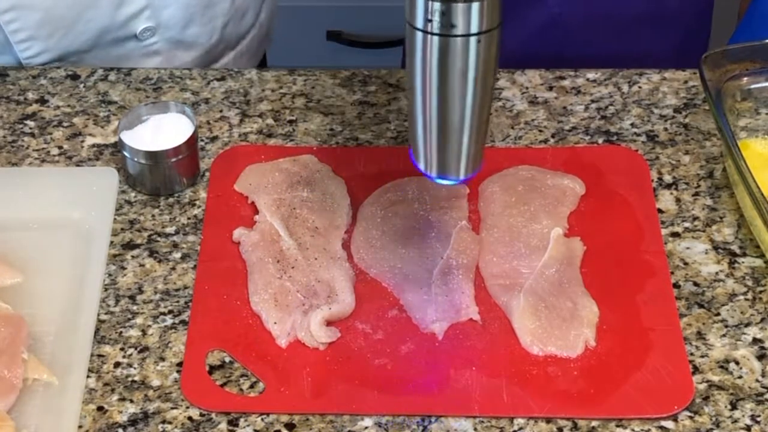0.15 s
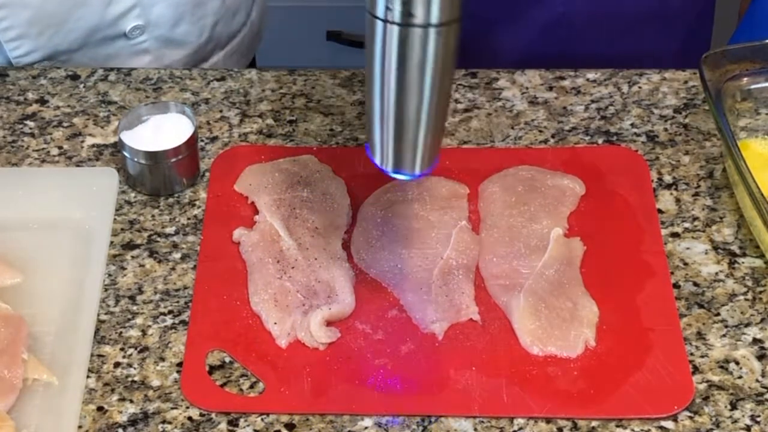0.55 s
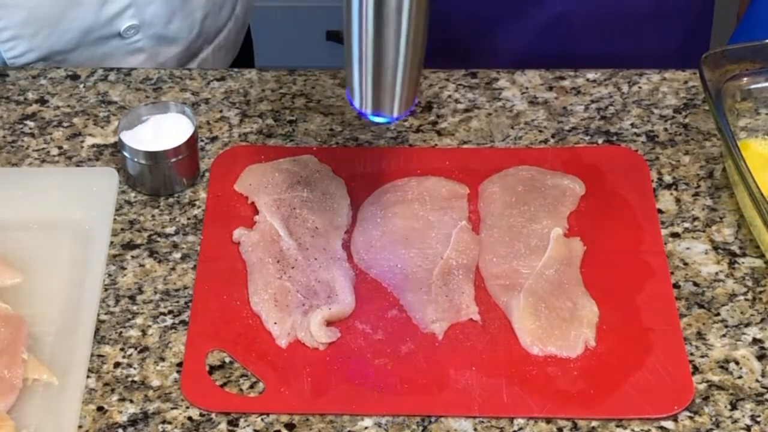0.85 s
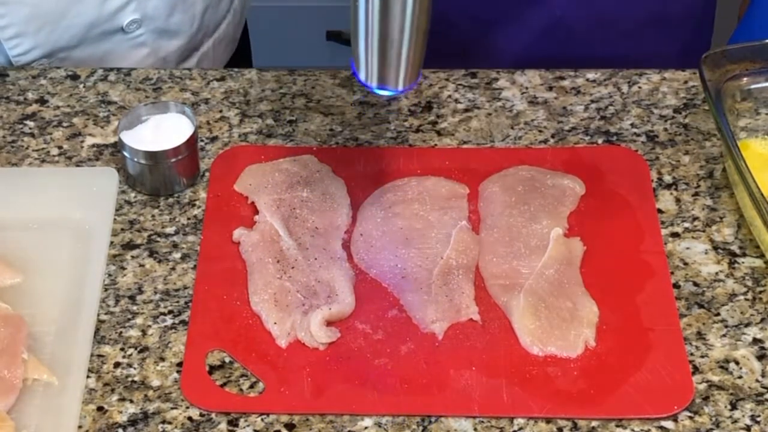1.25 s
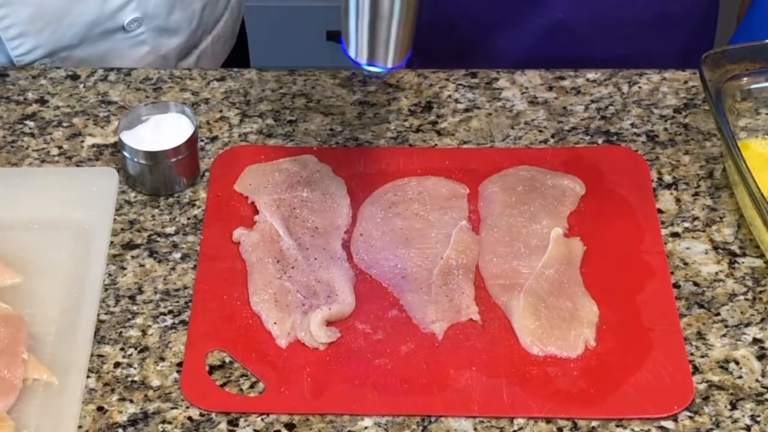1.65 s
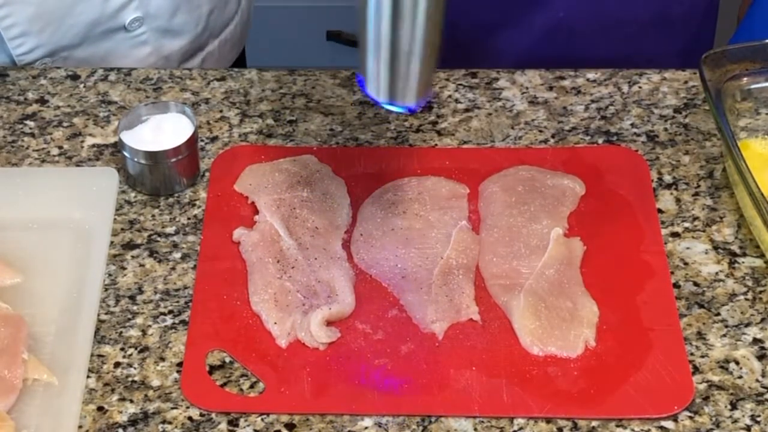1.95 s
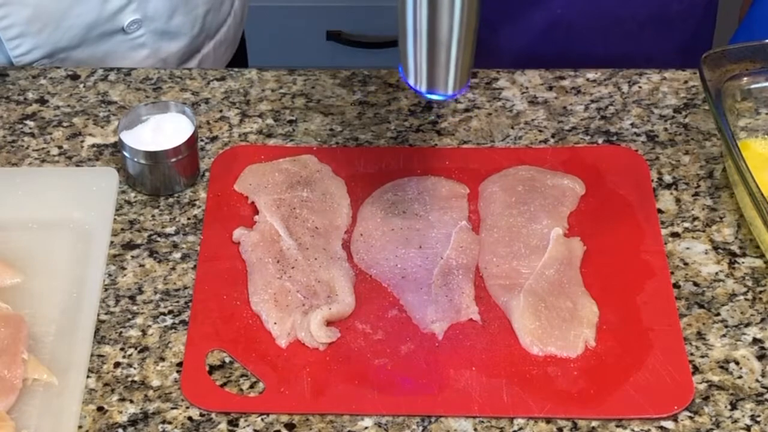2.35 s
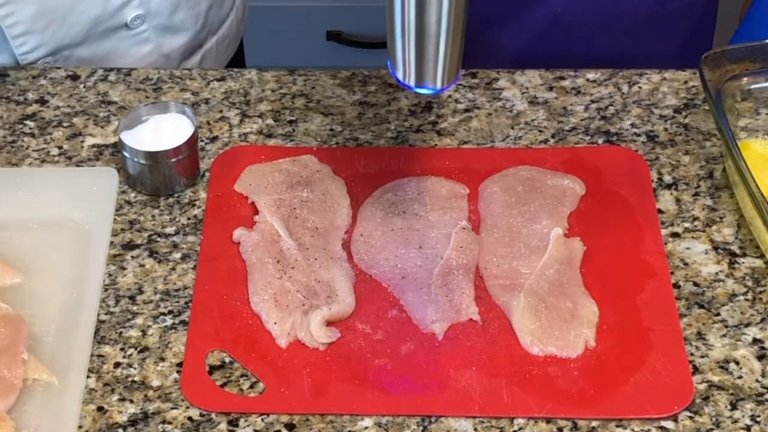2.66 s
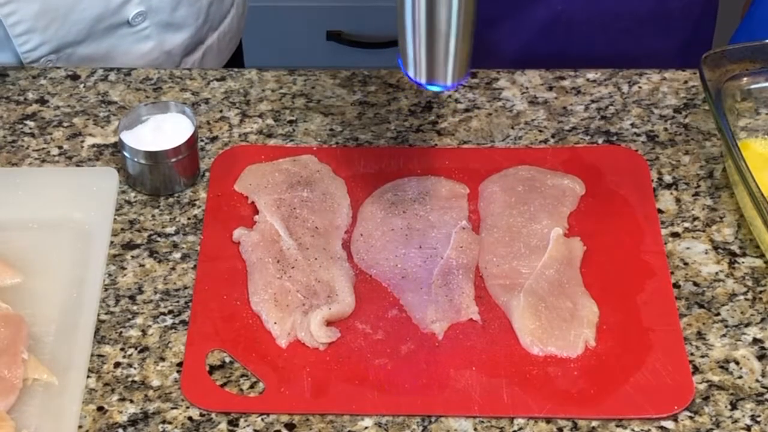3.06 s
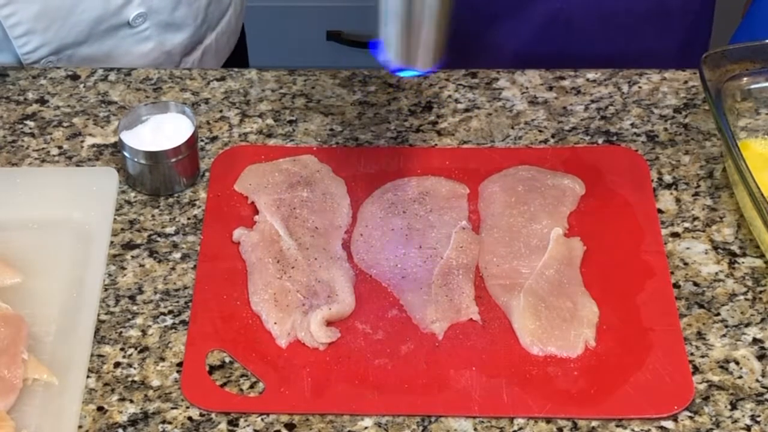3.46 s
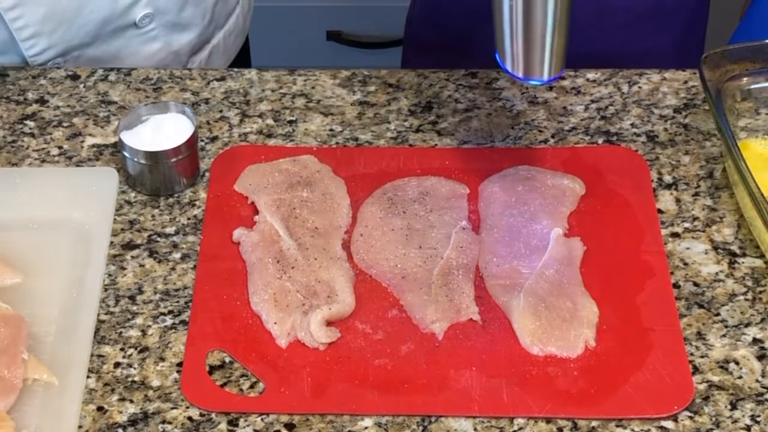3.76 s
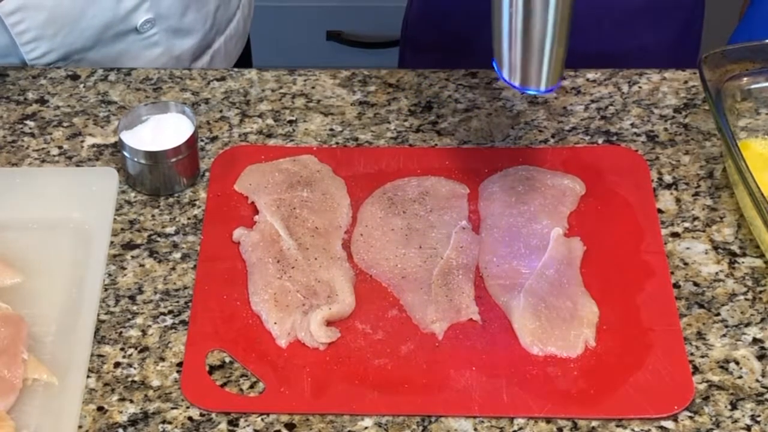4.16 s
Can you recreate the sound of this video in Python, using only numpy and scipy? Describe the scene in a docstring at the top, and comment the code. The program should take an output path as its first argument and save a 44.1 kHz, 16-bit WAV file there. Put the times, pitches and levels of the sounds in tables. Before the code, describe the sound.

Close up in a kitchen, an electric pepper grinder gives a wavering gear whine and a high, crunchy hiss in its steel housing. Soft ticks mark the start, a sharp peppercorn crack follows about a second in, and a louder one comes later among smaller snaps. The grinding turns lower and raspier toward the end. The sound is mono, with a faint low room tone behind it.

```python
"""A kitchen counter, with a battery pepper mill running above it, close to a mono microphone.
The motor sags and recovers as peppercorns load the burr; whenever they brake it, the gears whine
harder and the burr crushes louder, with a gritty hiss in a steel housing. Gear teeth catch early on,
a few corns snap, and a hard one makes the mill rasp near the end. Faint room rumble lies underneath."""
import sys
import numpy as np
from scipy import signal
from scipy.fft import rfft, irfft
from scipy.io import wavfile
from scipy.ndimage import uniform_filter1d, map_coordinates

SR = 44100
rng = np.random.default_rng(int(sys.argv[2]) if len(sys.argv) > 2 else 0)


def log_audio(samples):
    """Write samples as a 16-bit WAV file to the path given in sys.argv[1]."""
    # one column per channel
    frames = np.atleast_2d(samples).T
    # limit to full scale, then quantise
    limited = np.clip(frames, -1, 1)
    pcm = np.round(limited * 32767).astype(np.int16)
    wavfile.write(sys.argv[1], SR, pcm)


N = 190244
TIME = np.arange(N) / SR

# the motor under its changing load: (time [s], speed [turns/s])
MOTOR_SPEED = [(0.0, 83.57), (0.17, 84.54), (0.21, 81.13), (0.44, 88.26), (0.55, 87.68), (0.82, 79.83),
               (0.97, 87.68), (1.05, 79.5), (1.13, 83.67), (1.55, 87.56), (1.66, 82.2), (1.96, 79.46),
               (2.18, 86.54), (2.31, 82.31), (2.45, 84.66), (2.6, 79.4), (2.76, 80.22), (2.89, 74.73),
               (2.97, 82.95), (3.11, 70.29), (3.26, 77.31), (3.34, 74.12), (3.5, 83.56), (3.59, 79.42),
               (3.68, 82.36), (3.86, 71.05), (4.01, 67.94), (4.12, 73.34), (4.31, 78.3)]
# partials of the pinion's low and upper whines and of the second gear stage:
# (multiple of motor speed [x], relative level [dB])
PINION_LOW_ORDERS = [(6, -15), (9, -4), (12.33, -6.5), (18, -1.5), (21.33, -1)]
PINION_UPPER_ORDERS = [(27, 0.5), (30.5, -27)]
SECOND_STAGE_ORDERS = [(20, -2.3), (41.33, -22), (62, -19)]
# how tightly the gears mesh: (time [s], second stage base level [dB], upper whine base level [dB])
MESH_LEVELS = [(0, -44.5, -40), (.25, -43, -36.5), (.5, -56, -55), (.8, -40.5, -43.5), (.95, -53, -40),
               (1.05, -46, -44), (1.17, -40.5, -43), (1.36, -39.5, -36), (1.56, -46, -47), (1.95, -41, -41),
               (2.15, -46.5, -38.5), (2.45, -37, -40.5), (2.76, -41, -40), (2.9, -40.5, -44),
               (3.05, -46, -44), (3.11, -35.5, -35), (3.16, -47, -48), (3.48, -44, -40), (3.68, -46, -42),
               (3.9, -36.5, -47), (4.31, -37, -39)]
# the mill at work: (time [s], gear rattle level [dB], burr base level [dB])
WORK_LEVELS = [(0.0, -38, -39.0), (0.12, -34.0, -38.5), (1.05, -36.5, -35.5), (1.13, -38.5, -38.5),
               (1.4, -34, -38), (1.48, -36.5, -36.5), (1.55, -33, -42), (1.67, -35.5, -37.5),
               (2.57, -36, -39), (2.71, -34, -39.5), (2.79, -35.5, -37), (3.11, -35, -39.5),
               (3.21, -37.5, -36.5), (3.31, -35.5, -38), (3.36, -39.0, -37), (3.71, -38.0, -40.5),
               (3.8, -36.5, -39), (4.31, -38, -39)]
# spectra of uneven teeth at mean speed, knocks through the housing, crushed pepper and its splinters:
# (frequency [Hz], relative level [dB])
WHIRR_SPECTRUM = [(250, -36), (500, -15), (800, -14), (1000, -10), (1250, -6.5), (1480, -1), (1900, -0.5),
                  (2200, 0.5), (2380, -6), (2850, -8), (3550, -10.5), (4200, -11)]
HOUSING_SPECTRUM = [(2000, -11), (3000, -10.5), (3280, -0.5), (3600, -4), (3900, 0), (4450, 3),
                    (4950, -1.5), (5300, -2), (5600, 1.5), (6100, -9), (8000, -6.5), (15000, -26.5)]
BURR_SPECTRUM = [(3000, -39), (5300, -7), (6000, 2), (6600, 3.5), (7100, 1.5), (7500, -1.5), (8300, -7),
                 (9200, -6.5), (12000, -8)]
SPLINTER_SPECTRUM = [(5000, -1), (8200, -3), (9450, 5.5), (10200, 1.5), (11200, 1.5), (12400, -2),
                     (13000, -7), (13700, -9), (15800, -9.5)]
# housing resonances under the hand: (frequency [Hz], width [Hz])
HAND_MODES = [(4270, 230), (5650, 330), (6500, 350), (7150, 200)]
# the steel tube's two rings: (time [s], lower pitch [Hz], lower base level [dB], upper level [dB])
TUBE_RINGS = [(0, 8070, -46, -50), (.35, 8180, -40, -56), (.5, 7920, -44, -48), (1.2, 7775, -40.5, -51),
              (1.55, 7774, -49, -46.5), (2.3, 7844, -51, -47), (2.9, 7826, -43, -46),
              (3.45, 7820, -44.5, -48.5), (4.31, 7920, -43.5, -49)]
# room rumble: (frequency [Hz], relative level [dB])
RUMBLE_SPECTRUM = [(25, -29), (40, -20), (60, -5), (80, -6), (99, 2), (115, -3.5), (135, -1), (200, -8),
                   (300, -9.5), (500, -14.5), (1000, -26)]
# a gear tooth catches, a peppercorn snaps: (time [s], dry peak level [dB])
TOOTH_CATCHES = [(.083, -31), (.27, -26), (.452, -28)]
CORN_SNAPS = [(.085, -23), (1.0227, -8.5), (2.464, -20), (2.693, -21), (3.0996, -15), (3.1002, -4.2),
              (3.1121, -11), (3.747, -25), (4.216, -25)]
# what a catch and a snap set ringing: (frequency [Hz], relative level [dB], time to fall 60 dB [s])
CATCH_RINGS = [(1700, 0, .018), (2070, 1, .018), (2124, 28, 0.036)]
SNAP_RINGS = [(1950, -13, .004), (4260, -9, .004), (6190, 1.5, .004), (7400, 9.5, .0022), (8700, -1, .0025),
              (10600, -3, .0025), (13280, -13, .0025)]
# the level dips briefly: (time [s], gain [dB])
LEVEL_DIP = [(1.679, 0), (1.685, -17), (1.688, -17), (1.691, -5), (1.701, 0)]
# the mill labouring on a hard corn: (time [s], level [dB])
LABOUR_LEVEL = [(3.55, -72), (3.72, -42.5), (3.85, -35), (4.05, -38.5), (4.2, -42), (4.31, -47)]
# resonances of its rasp: (frequency [Hz], width [Hz], relative level [dB])
RASP_MODES = [(4600, 600, -11), (6800, 1500, -1), (9370, 600, -2)]
# its rough gear partials: (multiple of motor speed [x], relative level [dB])
ROUGH_ORDERS = [(30.5, -10), (41.33, -14), (61.5, -7.5), (64.5, -6)]


def undb(db):
    """Decibels to gain."""
    return 10 ** (np.asarray(db) / 20)


def unit(x):
    """Scale to rms 1."""
    return x / np.sqrt(np.mean(x ** 2))


def curves(table):
    """Each column of a time table, sample by sample."""
    times, *columns = np.transpose(table)
    return [np.interp(TIME, times, column) for column in columns]


def drift(per_s):
    """Smooth random motion of rms 1, changing about per_s times a second."""
    f = np.arange(N // 2 + 1) * SR / N
    return unit(irfft(rfft(rng.standard_normal(N)) / (1 + (f / per_s) ** 4), N))


def colour(x, spectrum):
    """Pass x through a body with the given response; rms 1."""
    hz, db = np.transpose(spectrum)
    f = np.maximum(np.arange(N // 2 + 1) * SR / N, 1)
    skirts = np.minimum(f / hz[0], 1) ** 2 * np.minimum(hz[-1] / f, 1) ** 2
    response = undb(np.interp(np.log(f), np.log(hz), db))
    return unit(irfft(rfft(x) * skirts * response, N))


def resonate(x, hz, width):
    """One resonance, gain 1 at its centre."""
    return signal.lfilter(*signal.iirpeak(hz, hz / width, fs=SR), x)


def ring(x, hz, width):
    """A steep-sided resonance of the mill's body; rms 1."""
    return unit(resonate(resonate(x, hz, width), hz, width))


def slide(x, rate):
    """Play x faster or slower as rate moves about its mean."""
    place = np.cumsum(rate)
    return map_coordinates(x, [place / place[-1] * (N - 1)], order=3)


def grains(per_s, spread_db):
    """Random clicks of either sign, their sizes scattered by spread_db."""
    happens = rng.random(N) < per_s / SR
    sign = np.sign(rng.standard_normal(N))
    size = undb(spread_db * np.clip(rng.standard_normal(N), -2, 2))
    return unit(happens * sign * size)


def braking(speed_hz):
    """How hard the pepper brakes the motor: 1 on a firm bite, negative as a corn gives way."""
    felt_over_s, firm_bite_hz_per_s = .045, 47
    slowing = -np.gradient(speed_hz) * SR
    return uniform_filter1d(slowing, int(felt_over_s * SR)) / firm_bite_hz_per_s


def whine(turns, orders, flutter_db, wobble_rad):
    """Tooth-mesh tones; play in the gears shakes the level and phase of each."""
    out = 0
    for multiple, db in orders:
        phase = 2 * np.pi * multiple * turns + wobble_rad * drift(26)
        out += undb(db + flutter_db * drift(37)) * np.sqrt(2) * np.sin(phase)
    return out


def gears(turns, speed_hz, brake):
    """The gear train sings at multiples of the motor speed, louder as its teeth are loaded."""
    low = whine(turns, PINION_LOW_ORDERS, flutter_db=4, wobble_rad=.21)
    stage = whine(turns, SECOND_STAGE_ORDERS, flutter_db=2, wobble_rad=.27)
    upper = whine(turns, PINION_UPPER_ORDERS, flutter_db=1.5, wobble_rad=.15)
    # the pinion is loudest at the speed where its tones meet resonances of the frame
    detune_hz = np.abs(speed_hz - 80.3)
    low_db = -55 + brake - .63 * detune_hz + drift(7.7)
    stage_db, upper_db = curves(MESH_LEVELS)
    stage_db += 3 * brake + 1.7 * drift(11)
    upper_db -= 1.7 * detune_hz
    return undb(low_db) * low + undb(stage_db) * stage + undb(upper_db) * upper


def tooth_knocks(turns, per_turn, spread_db, scrape):
    """One uneven knock per meshing tooth, with scraping in between."""
    tooth = np.floor(per_turn * turns + .15 * drift(600))
    hits = np.diff(tooth, prepend=tooth[0]) * rng.standard_normal(N)
    return unit(unit(hits) + scrape * grains(12000, spread_db))


def crunches(per_s, fade_s):
    """Gain of the grinding as crumbs give way: each jump starts at once and dies quickly."""
    crumbs = (rng.random(N) < per_s / SR) * rng.random(N)
    decay = np.exp(-1 / (fade_s * SR))
    return unit(1 + signal.lfilter([1], [1, -decay], crumbs))


def grinding(turns, speed_hz, brake):
    """Loose teeth whirr and rattle the housing while the burr crushes pepper to splinters."""
    rattle_db, burr_db = curves(WORK_LEVELS)
    splinter_db = -42.5 + 1.5 * brake + .17 * (burr_db - burr_db.mean()) + .6 * drift(8)
    teeth = colour(grains(7000, spread_db=3), WHIRR_SPECTRUM)
    # the whirr is tied to the gears' angle, so it sags with the motor
    whirr_db = -40 + .06 * (speed_hz - speed_hz.mean()) + .9 * drift(22)
    whirr = undb(whirr_db) * slide(teeth, speed_hz)
    knocks = tooth_knocks(turns, per_turn=20, spread_db=-2, scrape=1.1)
    rattle = undb(rattle_db) * colour(knocks, HOUSING_SPECTRUM)
    burr = undb(burr_db + .8 * brake) * colour(grains(12000, spread_db=0), BURR_SPECTRUM)
    splinters = undb(splinter_db) * colour(grains(12000, spread_db=2.5), SPLINTER_SPECTRUM)
    crunch = crunches(per_s=55, fade_s=.0027)
    return whirr + np.sqrt(crunch) * rattle + crunch * (burr + splinters)


def grip(x):
    """The hand's shifting hold lets single resonances of the housing swell and fade."""
    return x + sum(.3 * drift(2.5) * resonate(x, hz, width) for hz, width in HAND_MODES)


def steel_tube(brake):
    """Grit keeps the tube and the burr holder ringing; the holder follows the gear rattle."""
    lower_hz, lower_db, upper_db = curves(TUBE_RINGS)
    rattle_db, _ = curves(WORK_LEVELS)
    holder_db = -46 + 2.5 * (rattle_db - rattle_db.mean())
    grit = grains(8000, spread_db=7)
    lower_db += brake + 1.1 * drift(18)
    lower = slide(ring(grit, lower_hz.mean(), width=270), lower_hz)
    upper = ring(grit, hz=8550, width=330)
    holder = ring(grit, hz=4885, width=350)
    return undb(lower_db) * lower + undb(upper_db) * upper + undb(holder_db) * holder


def counter_echo(x, lag_s, sway, echo_db):
    """The stone counter returns the hiss to the microphone; the hand's sway shifts the delay."""
    lag = lag_s * SR * (1 + sway * drift(1.86))
    return x + undb(echo_db) * map_coordinates(x, [np.arange(N) - lag], order=3)


def kitchen(x, t60, wet_db):
    """Behind the close sound, a short diffuse tail from cupboards and walls."""
    t = TIME[:SR // 2]
    tail = rng.standard_normal(len(t)) * undb(-60 * t / t60) * (t > .006)
    return x + undb(wet_db) * signal.fftconvolve(x, tail / np.linalg.norm(tail))[:N]


def room_rumble():
    """Room tone: steady low noise, well under the mill."""
    return undb(-56.5) * colour(rng.standard_normal(N), RUMBLE_SPECTRUM)


def tooth_catches():
    """A gear tooth catches and gives the plastic frame a dull little knock."""
    t = TIME[:SR // 20]
    frame = sum(undb(db - 60 * t / t60) * np.sin(2 * np.pi * hz * t) for hz, db, t60 in CATCH_RINGS)
    blows = np.zeros(N)
    for time_s, peak_db in TOOTH_CATCHES:
        blows[int(time_s * SR)] = undb(peak_db)
    return signal.fftconvolve(blows, frame / np.abs(frame).max())[:N]


def corn_snaps():
    """A corn splits: a hard click in the burr, then a short scatter of fragments."""
    out = np.zeros(N)
    t = TIME[:SR // 20]
    attack = 1 - np.exp(-t / .00015)
    for time_s, peak_db in CORN_SNAPS:
        detunes = 1 + .0047 * rng.standard_normal(len(SNAP_RINGS))
        modes = sum(undb(db - 60 * t / t60) * np.sin(2 * np.pi * hz * detune * t)
                    for (hz, db, t60), detune in zip(SNAP_RINGS, detunes))
        force = undb(-19 - 60 * t / .014) * rng.standard_normal(len(t))  # the fragments
        force[0] = 1  # the split itself
        click = signal.fftconvolve(modes * attack, force)[:len(t)]
        start = int(time_s * SR)
        out[start:start + len(t)] += undb(peak_db) * click / np.abs(click).max()
    return out


def labouring(turns):
    """A hard corn loads the burr: the teeth rasp and their partials turn rough."""
    labour_db, = curves(LABOUR_LEVEL)
    strain = tooth_knocks(turns, per_turn=20, spread_db=8, scrape=.71)
    rasp = sum(undb(db - 4.5) * ring(strain, hz, width) for hz, width, db in RASP_MODES)
    rough_whine = whine(turns, ROUGH_ORDERS, flutter_db=4, wobble_rad=3.8)
    return undb(labour_db) * (rasp + rough_whine)


def scene():
    """The mill close up above the counter, the room behind it; one microphone on both channels."""
    speed_hz, = curves(MOTOR_SPEED)
    turns = np.cumsum(speed_hz) / SR
    brake = braking(speed_hz)
    hiss = grip(grinding(turns, speed_hz, brake)) + steel_tube(brake) + labouring(turns)
    hiss = counter_echo(hiss, lag_s=.001068, sway=.093, echo_db=-14)
    gear_whine = gears(turns, speed_hz, brake)
    clatter = kitchen(hiss + corn_snaps() + tooth_catches(), t60=.22, wet_db=-13)
    mono = gear_whine + clatter + room_rumble()
    return np.array([mono, mono])


def record(dry):
    """The level dips once, briefly, and the highest treble is cut."""
    dip_db, = curves(LEVEL_DIP)
    top_hz = 15800
    lowpass = signal.ellip(10, .1, 80, top_hz, fs=SR, output="sos")
    return signal.sosfilt(lowpass, dry * undb(dip_db))


dry = scene()
out = record(dry)
log_audio(out)
```